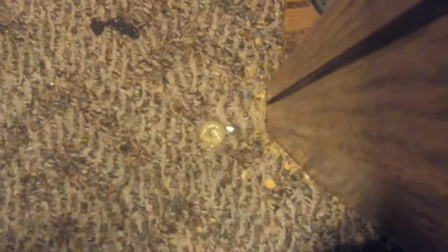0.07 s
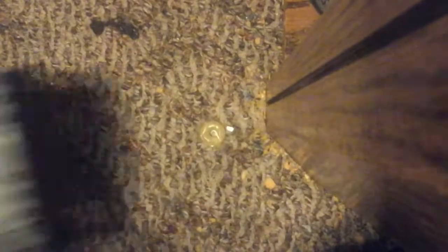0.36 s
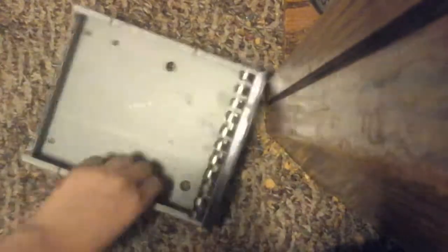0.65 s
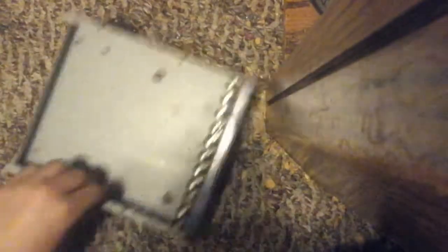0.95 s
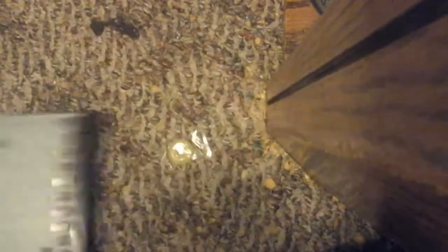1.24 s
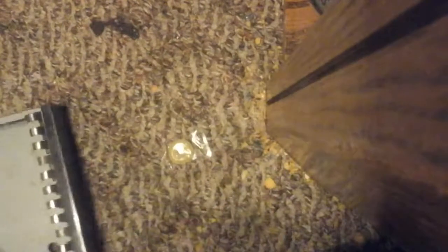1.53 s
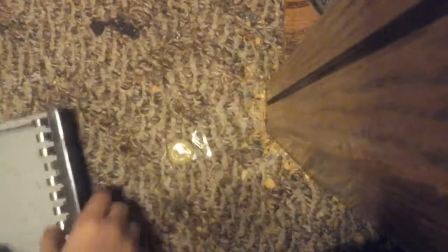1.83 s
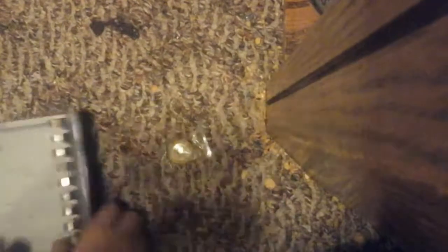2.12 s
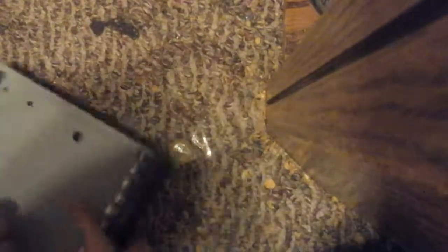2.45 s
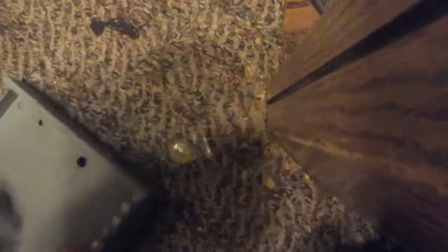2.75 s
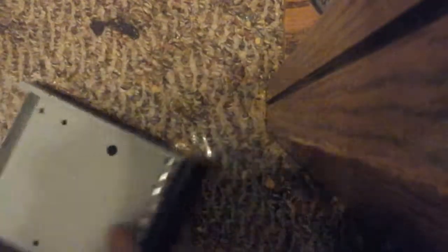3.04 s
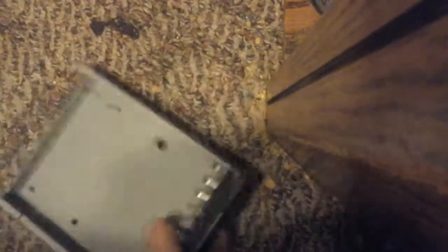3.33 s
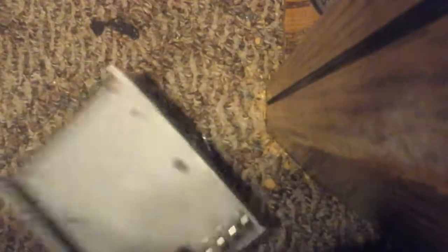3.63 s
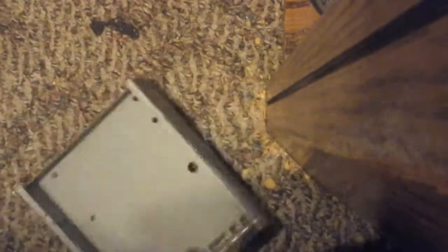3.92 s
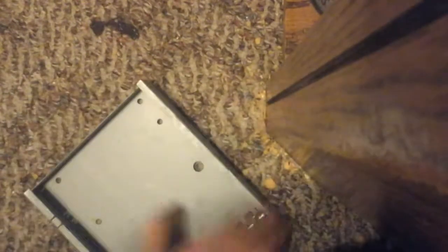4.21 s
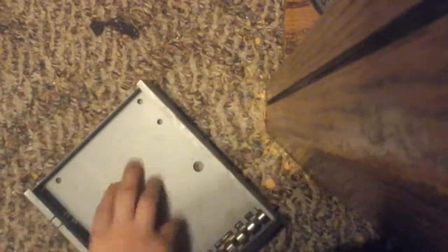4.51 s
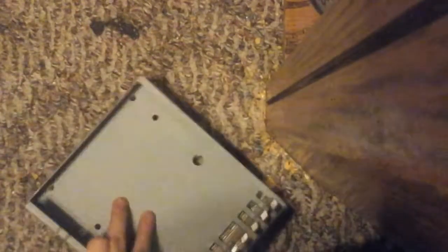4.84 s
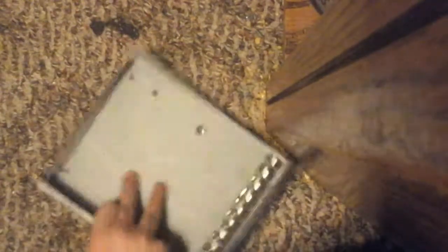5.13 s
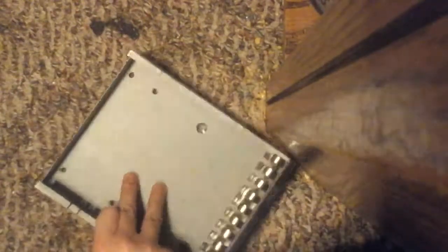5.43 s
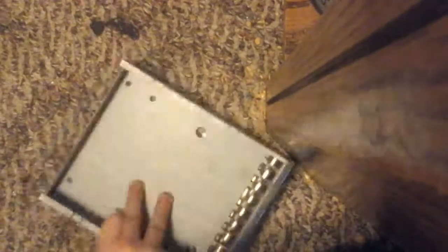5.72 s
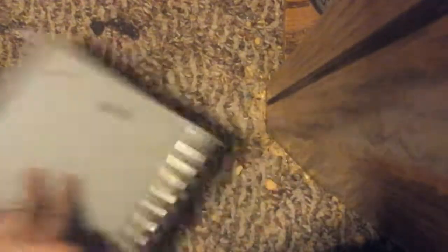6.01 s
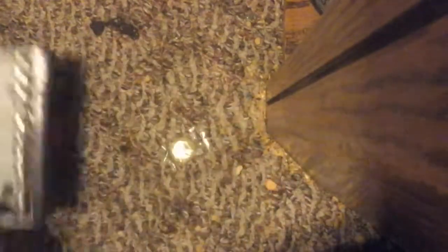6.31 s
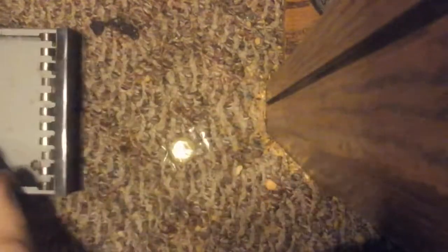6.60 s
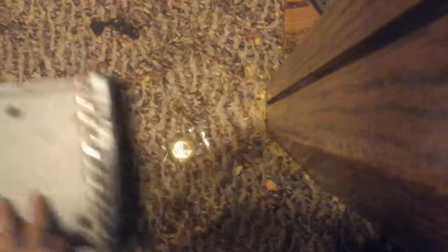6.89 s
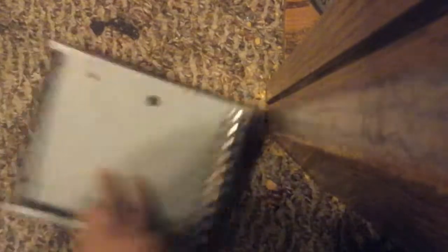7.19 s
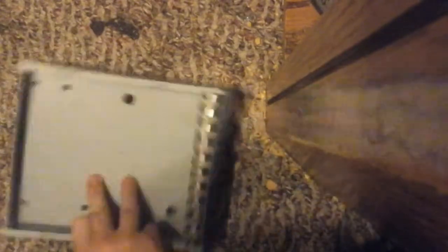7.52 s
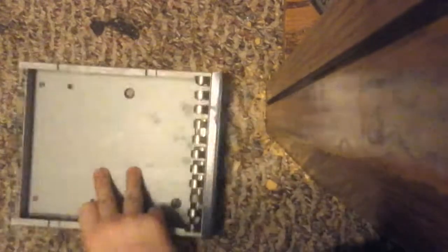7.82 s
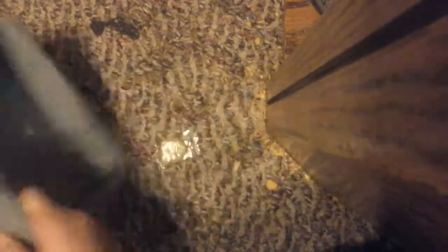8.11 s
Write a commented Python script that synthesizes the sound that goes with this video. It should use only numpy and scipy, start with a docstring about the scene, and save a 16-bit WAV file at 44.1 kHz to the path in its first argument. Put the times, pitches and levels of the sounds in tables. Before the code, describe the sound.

A hinged sheet-metal box is slammed onto a wrapped candy on a carpeted floor, several times at uneven intervals. Each blow gives a dull thump and a bright clatter of loose panels, some bouncing into quick extra clanks. Between blows the hinge ticks and the box scuffs softly over the carpet. It is heard close by in a small room with a short echo and a low, fan-like rush.

```python
"""Dull thumps and a bright metal clatter break in, close by, over a low rush that later dips and returns.
A hinged sheet-metal box is slammed again and again onto a wrapped candy on a carpeted floor.
Each blow thumps through the carpet and shakes the loose panels; a harder hit is brighter and
rattles more. Between blows the box clicks and is dragged about. A small room echoes the clatter."""
import sys
import numpy as np
from scipy import signal
from scipy.fft import rfft, irfft, next_fast_len
from scipy.io import wavfile
from scipy.ndimage import map_coordinates

SR = 44100
rng = np.random.default_rng(int(sys.argv[2]) if len(sys.argv) > 2 else 0)


def wav_record(signal):
    """Record a signal, one row per channel, as 16-bit PCM in the file named by sys.argv[1]."""
    frames = np.transpose(np.atleast_2d(signal))
    bounded = np.clip(frames, -1, 1)
    # unit amplitude maps onto the largest positive 16-bit level
    quanta = np.round(bounded * 32767).astype(np.int16)
    wavfile.write(sys.argv[1], SR, quanta)


N = 368235
T = np.arange(int(SR * 0.4)) / SR  # the time axis of one short sound, in seconds


def amp(db):
    """Turn decibels into a factor to multiply by."""
    return 10 ** (np.asarray(db) / 20)


def unit(x):
    """Scale a signal to an average strength (rms) of 1."""
    return x / np.sqrt(np.mean(x ** 2) + 1e-20)


def along(points, hz):
    """Read between (f/Hz, value) points on a logarithmic frequency axis."""
    freqs, values = np.transpose(points)
    return np.interp(np.log(hz + 1), np.log(freqs + 1), values)


def filtered(x, response):
    """Multiply each frequency in x by the gain response(hz)."""
    size = next_fast_len(len(x) + 8192)
    return irfft(rfft(x, size) * response(np.fft.rfftfreq(size, 1 / SR)), size)[:len(x)]


def shaped(x, tone):
    """Turn parts of a sound up or down, following (f/Hz, level/dB) points."""
    return filtered(x, lambda hz: amp(along(tone, hz)))


def noise(tone, size):
    """Noise of strength 1, shaped by (f/Hz, level/dB) points."""
    return unit(shaped(rng.standard_normal(size), tone))


def wobble(rate):
    """A smooth curve through `rate` random values a second."""
    values = rng.standard_normal(int(N * rate / SR) + 4)
    return map_coordinates(values, [np.arange(N) * rate / SR])


def add(track, start_s, sound):
    """Mix a sound into the track at the given time."""
    part = track[max(round(start_s * SR), 0):][:len(sound)]
    part += sound[:len(part)]


def fade(fade_s):
    """Die away by 60 dB in fade_s seconds; every fade time below means this."""
    return amp(-60 * T / fade_s)


def ring(tones, scatter_db):
    """A struck object's fading tones, each with a new strength and phase on every blow."""
    return sum(amp(db + scatter_db * rng.normal()) * fade(fade_s)
               * np.sin(2 * np.pi * (hz * T + rng.random())) for hz, db, fade_s in tones)


def background():
    """A dull rush with a few droning pitches, like a distant fan."""
    # the rush's level, nearly steady at first, dipping and returning later: t/s, level/dB
    rush_levels = [(0.0, -45), (1.56, -46.5), (1.86, -44), (3.72, -46), (3.9, -42), (4.37, -52),
                   (4.67, -53), (5.02, -48), (6.12, -60.5), (6.49, -57), (6.67, -50), (7.16, -46),
                   (7.68, -53), (8.35, -49.5)]
    # the tone of the rush: f/Hz, level/dB
    rush_tone = [(15, -42), (25, -8.5), (44, -10), (113, -2), (246, -2), (313, -1.5), (421, -8.5),
                 (722, -8.5), (997, -13.5), (1080, -7.5), (1490, -18), (4870, -20.5), (7500, -29),
                 (11800, -29.5), (15500, -34.5)]
    # the pitches that drone in it: f/Hz, width/Hz, level/dB
    drone_peaks = [(115.4, 18, 4), (319.1, 10.7, 2), (275, 30, -18), (704, 50, -4), (1088, 130, -2.5)]

    def peaks(hz):
        return sum(amp(db) / np.sqrt(width) / (1 + (2 * (hz - centre) / width) ** 2)
                   for centre, width, db in drone_peaks)

    drone = unit(filtered(rng.standard_normal(N), peaks))
    level_db = np.interp(np.arange(N) / SR, *np.transpose(rush_levels))
    return amp(level_db) * (amp(-1.17) * noise(rush_tone, N) + amp(-4.5) * drone)


def room(x, echo_db, build_s):
    """Add a small room's blurred echo, which builds up as the walls reply."""
    # how long the room rings: f/Hz, fade/s
    fade_times = [(100, 0.17), (500, 0.28), (2000, 0.26), (5500, 0.22), (12000, 0.12)]
    hz, t, spectrum = signal.stft(rng.standard_normal(len(T)), SR, nperseg=256)
    decay = amp(-60 * t / along(fade_times, hz)[:, None])
    tail = signal.istft(spectrum * decay, SR, nperseg=256)[1][:len(T)]
    tail *= 1 - np.exp(-(T / build_s) ** 2)
    return x + amp(echo_db) * signal.fftconvolve(x, tail / np.linalg.norm(tail))[:len(x)]


def scuffs():
    """Carpet fibres drag over the metal in an uneven hiss, and some catch with a tiny snap."""
    # the box dragged or shifted by hand: t/s of the fastest moment, length/s, level/dB
    drags = [(1.037, 0.15, -42.5), (1.6, 1, -58), (2.284, 0.34, -47.5), (2.72, 0.17, -58),
             (3.277, 0.23, -48.5), (3.422, 0.12, -44), (4.75, .26, -55), (6.67, 0.27, -58.5),
             (7.998, 0.2, -55)]
    # the tone of carpet rubbing on metal: f/Hz, level/dB
    scuff_tone = [(300, -13), (1100, -0.5), (2500, -6), (3100, -8.5), (4500, 1), (5600, -6.5), (7500, -18),
                  (15000, -25.5)]
    hiss = amp(2.5 * wobble(25) + 3.0 * wobble(300)) * noise(scuff_tone, N)
    catches = (rng.random(N) < 70 / SR) * rng.exponential(size=N)  # about 70 a second
    snap = noise(scuff_tone, len(T)) * fade(0.015)
    snaps = unit(signal.fftconvolve(catches, snap)[:N])
    t = np.arange(N) / SR
    level = np.full(N, amp(-73))  # the hand never rests quite still
    for s, length, db in drags:
        drop_db = np.where(t < s, 28, 28.5)  # one length before and after the fastest moment
        level += amp(db - drop_db * ((t - s) / length) ** 2)
    return amp(-2) * level * (hiss + 0.33 * snaps)


def thumps():
    """The box's flat side pushes the air out against the carpet and sets the floor booming."""
    # the box landing flat: t/s, level/dB
    landings = [(.630, -18.5), (.652, -12.5), (0.679, -18), (.717, -22), (.753, -25), (3.3618, -5.5),
                (3.7251, -11), (3.757, -24.5), (4.015, -22.5), (4.078, -29.5), (5.1677, -12.5),
                (5.682, -20.5), (6.484, -25), (7.2299, -1.5), (7.654, -20)]
    # the low boom of box, floorboards and room: f/Hz, level/dB
    boom_tone = [(30, -24), (75, -16.5), (112, 3), (160, -2.5), (230, 0), (320, 0.5), (420, -7.5),
                 (560, -11), (750, -22.5), (1200, -34), (3000, -74)]
    # the lasting tones of the floorboards: f/Hz, level/dB, fade/s
    board_tones = [(114.6, 1.5, 0.26), (235, -2, 0.32), (304, -0.5, .28), (385, -13.5, .22)]
    rocks = [(s + 0.016, db - 11.5) for s, db in landings]  # the box rocks once more, softly
    lead_s = 0.008  # the push starts early so that its middle falls on the landing
    swell = 1 - np.exp(-T / 0.0057)
    out = np.zeros(N)
    for s, db in list(landings) + rocks:
        width_s = 0.00048 * amp(-0.15 * db)  # a harder landing gives a shorter push
        u = (T - lead_s) / width_s
        push = -u * np.exp((1 - u * u) / 2)
        add(out, s - lead_s, amp(db - 3.5) * push)
        boom = noise(boom_tone, len(T)) * (amp(-13.5) * fade(0.11) + amp(-21.5) * fade(0.29))
        boards = amp(-29) * ring(board_tones, scatter_db=-3)
        bass_db = -4.5 - 0.36 * db  # a softer landing sounds deeper
        add(out, s, amp(db) * swell * shaped(boom + boards, [(130, bass_db), (280, 0)]))
    # a panel this small gives off little deep bass
    return shaped(out, [(30, -2), (50, -4), (78, -3), (105, 0)])


def ripple(depth_db, spacing_hz):
    """Each spot on the sheet favours its own pitches: a random gain across the frequencies."""
    values = rng.standard_normal(512)
    return lambda hz: amp(depth_db * np.interp(hz / spacing_hz, np.arange(len(values)), values))


def note(hz, db, width_hz):
    """The note of a panel or the rim: seven close tones that hand and carpet quickly damp."""
    fade_s = 0.055
    neighbours = [(hz + width_hz * rng.normal(), -8, fade_s) for _ in range(6)]
    return amp(db) * ring([(hz, -2, fade_s)] + neighbours, scatter_db=1)


def clack(knock_db, clank_db, edge_db, rattle_db):
    """One metal contact: a crack, then loose panels chatter in a dying buzz as the steel rings."""
    # the sheet's many crowded tones, heard as noise: f/Hz, level/dB
    sheet_tone = [(60, -19), (130, -8.5), (350, -9.5), (650, -10), (1100, -8.5), (2000, -4), (2700, -6),
                  (3150, -6), (3800, 2), (5500, 0.5), (6600, -2.5), (7600, -10.5), (11500, -16),
                  (15500, -30)]
    # the panels' strongest tones: f/Hz, level/dB, fade/s
    steel_tones = [(1053, -3.5, .27), (1390, -2.5, 0.15), (1523, -5, .13), (1610, -8, 0.29),
                   (1945, -2, 0.1), (2674, -2, 0.16), (2714, -1, 0.16), (2913, -0.5, 0.22),
                   (3690, -2, 0.15), (4190, 2, .11), (4600, 1, .11), (4740, 0, .10), (4840, 1, .11),
                   (5260, -1, 0.11), (5530, 3, .115), (6300, -8, .1)]
    crack = noise(sheet_tone, len(T)) * fade(0.031)
    chatter = unit(amp(2.5 * wobble(400)[:len(T)]))
    buzz = shaped(noise(sheet_tone, len(T)), [(600, 1.5), (1500, 1.6), (5500, -1), (9000, 2)])
    rattle = amp(rattle_db - 3) * buzz * chatter * fade(0.19)
    sheet = filtered(crack + rattle, ripple(depth_db=3.5, spacing_hz=150.7))
    ringing = amp(-26) * ring(steel_tones, scatter_db=2)
    # a broad contact favours the low knock and middle clank, a sharp corner the high edge
    tone = [(550, knock_db), (1000, clank_db), (2200, clank_db), (3600, 0.011),
            (6500, 0), (8000, edge_db), (15000, 1.2 * edge_db)]
    return shaped(sheet + ringing, tone)


def clatter():
    """The panels and hinge strike one another at each blow and as the box is lifted."""
    # metal meeting metal; knock, clank and rim say how much of the backed panel, the free sheet
    # and the stiff rim is struck: t/s, level/dB, knock/dB, clank/dB, rim/dB, f/Hz of the panel
    contacts = [(0.625, -1.5, -4.5, 5.5, -6, 1520), (.635, -5, -10.5, -3.5, -6, 1888),
                (.639, -1, -4, 0.5, -3, 2810), (.646, -2, -4.5, 3.5, -1, 1970), (.651, -1, -2, -5, 1, 1090),
                (.673, 0.5, -5, 2.5, -9, 1076), (.712, -1.5, -8, 5, -3.5, 2760),
                (.748, -5.5, -5, 0, 0.5, 2750), (1.252, -26, 2, 14, -4, 1400),
                (1.259, -12.5, 6, 5.5, -13, 1420), (1.899, -9, 3, 2, -9, 1060),
                (2.909, -16.5, -4, -3, -5, 1400), (3.022, -20, -4, 10, -5, 1047),
                (3.364, -15.5, 2, 9.5, -9, 1045), (3.367, -13.5, -2, 9, 1, 2640),
                (3.391, -21.5, 2, 11.5, -1, 1047), (3.729, -7, -1, 6, -10.5, 2810),
                (3.738, -5.5, -1.5, 3.5, -6.5, 1930), (3.748, -4.5, -5.5, 0, -9.5, 1515),
                (3.756, -3.5, -7, -1, 3, 2845), (3.766, -7, -4.5, 4, 0, 2850),
                (3.989, -10, -15, 1, 4, 2700), (4.005, -7.5, -14.5, 0, -3, 1900),
                (4.009, 3.5, -20.5, -1.5, 1, 2640), (4.028, -8, -13, -1.5, -7.5, 2610),
                (4.074, -2.5, -15.5, -0.5, 2.5, 2650), (4.123, -12, -10, -0.5, -7.5, 2910),
                (5.149, 3, -2.5, -3, -8, 2586), (5.166, -4, -3, 4, -13.5, 1606),
                (5.621, -8.5, 1.5, 6, -2.5, 1113), (5.655, -27, -6.5, 0, -12.5, 1400),
                (5.669, 1, -2.5, -4, -10, 1905), (5.710, -19, 7, -0.5, -11, 2630),
                (6.485, -14, 4, 2.5, -8, 1050), (6.494, -16, 5, -1, -4, 1700),
                (7.215, 1, -8, 0, -4.5, 1435), (7.218, .3, -6, -3, -6, 2674),
                (7.250, -13, -2, 3.5, -4.5, 1063), (7.655, -11.5, -8, 1, -6.5, 1903),
                (7.658, -3, -7.5, -3.5, -10, 2890), (7.952, -17, -8, -1.5, -5, 1060)]
    # light ticks of the loose hinge: t/s, level/dB
    hinge_ticks = [(.963, -32), (1.058, -21.5), (1.711, -28.5), (2.289, -24.5), (2.725, -30), (4.754, -32),
                   (5.422, -24.5), (5.445, -35), (5.868, -35), (5.908, -27), (7.435, -34), (7.937, -29.5),
                   (8.055, -35)]
    attack = 1 - np.exp(-T / 0.001)
    out = np.zeros(N)
    for s, db, knock_db, clank_db, rim_db, panel_hz in contacts:
        panel_db = -7 - 0.22 * db + 0.4 * rim_db  # a hit on the rim leaves the panel free to sing
        panel = note(panel_hz, panel_db, width_hz=80)
        rim_hz = 5420 + 130 * rng.normal()  # shifts with the spot that is hit
        rim = note(rim_hz, rim_db, width_hz=190)
        edge_db = 0.15 * db - 0.4 * clank_db  # harder is brighter, broader is duller
        rattle_db = -9 + 0.25 * db  # a harder hit shakes more parts loose
        blow = attack * (clack(knock_db, clank_db, edge_db, rattle_db) + panel + rim)
        add(out, s, amp(db - 8) * room(blow, echo_db=-14.5, build_s=0.007))
    for s, db in hinge_ticks:
        tick = attack * clack(knock_db=2, clank_db=12, edge_db=-5.5, rattle_db=-16)
        add(out, s, amp(db - 12.5) * room(tick, echo_db=-12, build_s=0.011))
    return out


def scene():
    """All the sounds added together in one channel."""
    return (clatter() + thumps() + scuffs() + background())[None]


def record(dry):
    """Round off the loudest peaks and remove the very highest treble."""
    top_hz = 15600
    rounded = dry[0] / (1 + np.abs(dry[0]) ** 4) ** (1 / 4)
    return filtered(rounded, lambda hz: hz < top_hz)[None]


dry = scene()
out = record(dry)
wav_record(out)
```